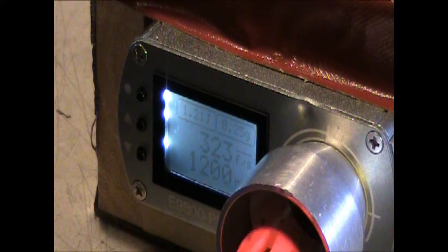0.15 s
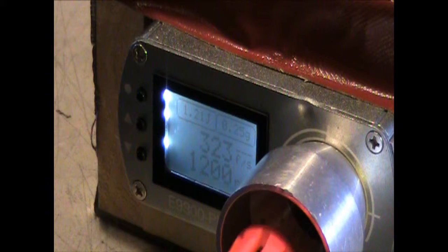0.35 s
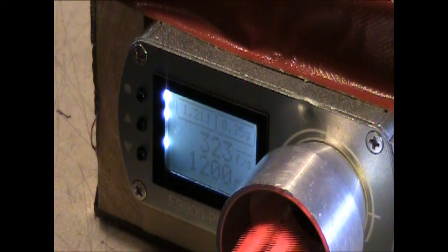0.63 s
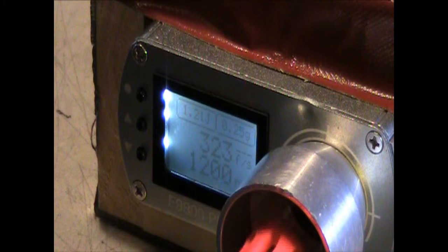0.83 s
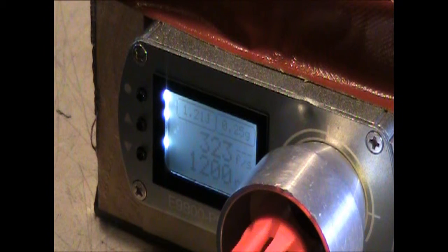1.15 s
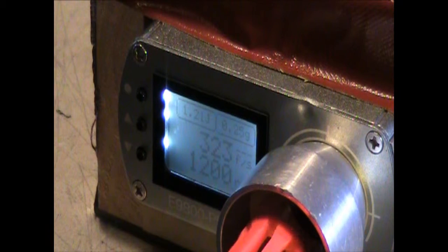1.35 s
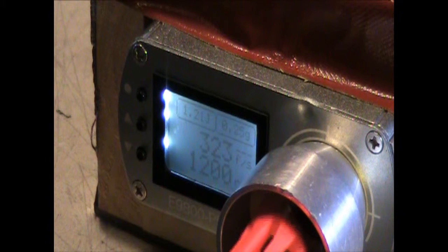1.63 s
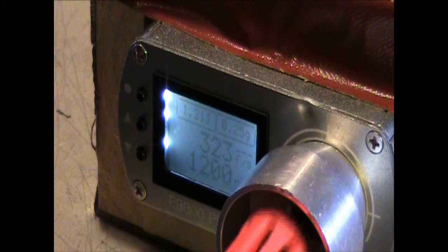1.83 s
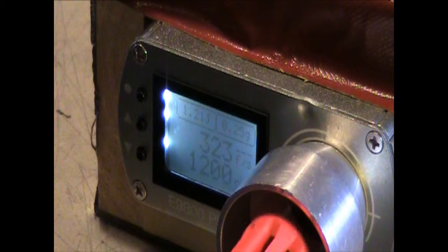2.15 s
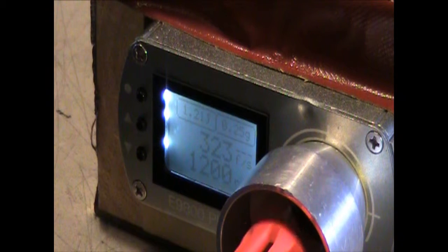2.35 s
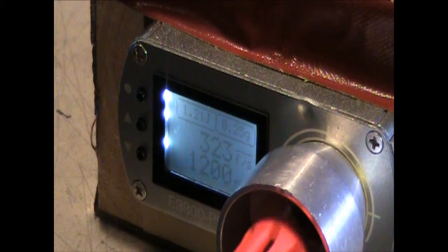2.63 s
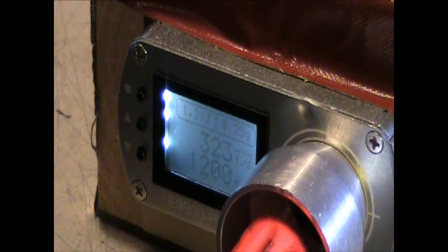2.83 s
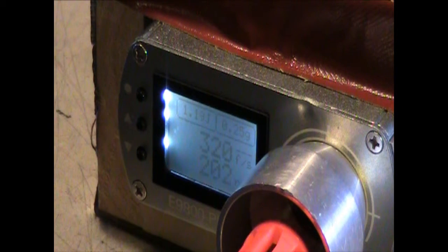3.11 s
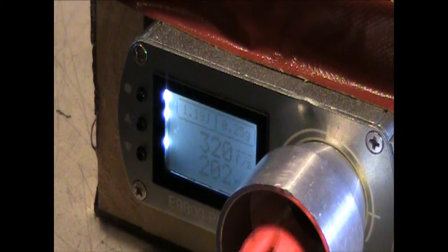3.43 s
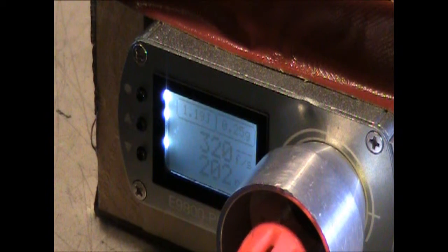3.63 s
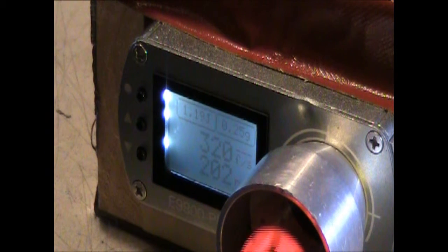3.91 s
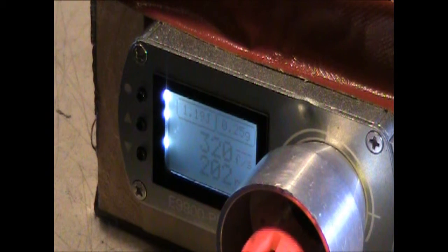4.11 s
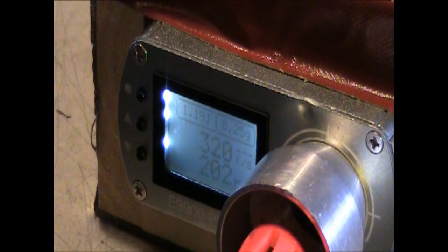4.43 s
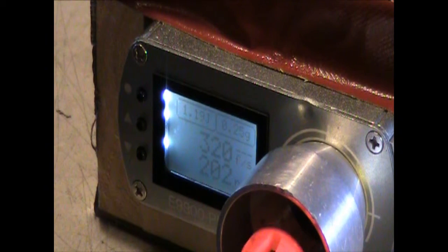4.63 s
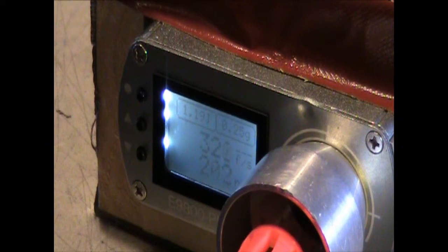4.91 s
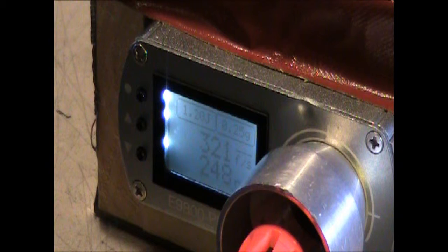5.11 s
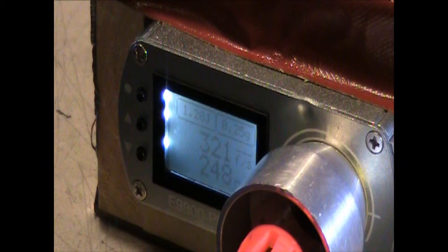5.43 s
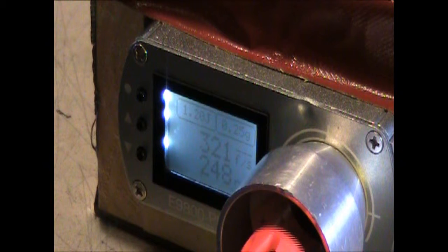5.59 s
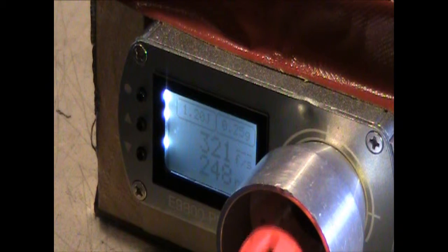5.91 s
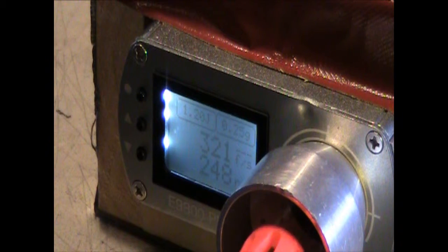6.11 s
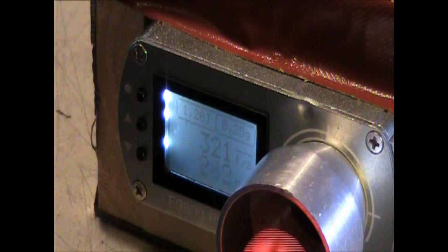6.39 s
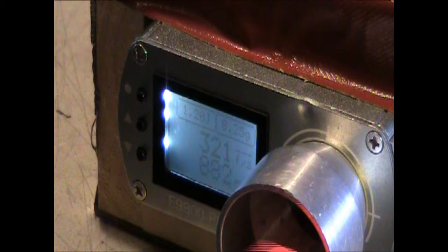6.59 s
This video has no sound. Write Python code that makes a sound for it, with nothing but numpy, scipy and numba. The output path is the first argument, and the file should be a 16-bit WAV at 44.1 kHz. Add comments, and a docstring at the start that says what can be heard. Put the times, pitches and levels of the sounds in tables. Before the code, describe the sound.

Close stereo pickup of an electric airsoft rifle in a small ventilated room. Ten trigger pulls, five of them double: a gritty geared whirr of under a tenth of a second winds up, the piston slams with a bright metallic crack, and the gears coast down. Small plastic trigger clicks fill the gaps. Faint hum and air noise dip after each loud shot, then creep back; the last second holds only soft handling.

```python
"""Airsoft rifle in a small room

An electric airsoft rifle fires into a chronograph: ten trigger pulls, five of them double shots.
Geared motor noise whirrs up against the spring, ringing modes and noise bursts make the piston's slam,
the gears coast to rest, and short filtered bursts give the plastic clicks between.
A close stereo microphone with gain control ducks the humming, ventilated room after loud shots."""
import sys
import numpy as np
from scipy import signal
from scipy.fft import rfft, irfft, next_fast_len
from scipy.io import wavfile
from scipy.ndimage import uniform_filter1d, minimum_filter1d
from numba import njit

SR = 44100
rng = np.random.default_rng(int(sys.argv[2]) if len(sys.argv) > 2 else 0)


def generate_wav(signal):
    """Clip the signal to [-1, 1] and save it as 16-bit WAV at the path in sys.argv[1]."""
    frames = np.transpose(np.atleast_2d(signal))
    scaled = np.clip(frames, -1, 1) * 32767
    pcm = np.round(scaled).astype(np.int16)
    wavfile.write(sys.argv[1], SR, pcm)


N = 297675
TIME = np.arange(N) / SR

# Room air, before the microphone. Each row: frequency in Hz, relative level in dB.
AIR_COLOUR = [(25, -30), (80, -22), (118, -10), (175, -15), (250, -3), (330, -8), (420, -8), (680, -14),
              (1000, -19), (1500, -21.5), (2800, -27.5), (5000, -35.5), (9000, -43), (16000, -50)]
# Mains hum and faint electrical whines. Each row: frequency in Hz, mean rms level in dB.
HUM = [(119.7, -78.5), (240, -69.5), (281, -82.5), (1362, -85), (2719, -93), (4350, -99)]
# Stereo spread of sound from all round. Each row: frequency in Hz, side over mid in dB.
WIDTH = [(100, -7), (700, -6.5), (2000, -7.5), (5000, -2.5), (10000, -3)]
# Colour of the near walls. Each row: frequency in Hz, relative level in dB.
WALL_COLOUR = [(50, -15.5), (150, 7.5), (260, 7.5), (700, 0), (1500, 3.5), (4000, -3), (8000, 1.5),
               (16000, -3)]

# Trigger let go or grip shifted. Each row: start in seconds, click in dB, rebound against the click in dB.
CLICKS = [(.0473, -52.5, -19.5), (.5726, -49, 2), (1.3379, -36.5, -16.5), (1.942, -43, -13.5),
          (2.398, -44, -3), (2.742, -49, -4.5), (2.8716, -42.5, -4.5), (2.927, -45, -22.5),
          (3.3507, -34, -19.5), (3.8152, -43.5, -22), (4.4438, -57, -9), (5.237, -51.5, -3.5),
          (6.5146, -50.5, -16.5), (6.562, -58.5, -15)]
# Rifle shifted in the hands. Each row: centre in seconds, half length in seconds, relative level in dB.
RUSTLES = [(2.875, .04, -69.5), (6.225, 0.016, -69), (6.307, 0.092, -76)]
# A soft tap as the rifle is moved: start in seconds, frequency in Hz, decay in seconds, level in dB.
NUDGE = (6.257, 760, .011, -58)
# Colour of the plastic stock. Each row: frequency in Hz, relative level in dB.
STOCK_COLOUR = [(200, -23), (900, -7.5), (2100, 0), (3000, -7), (4300, -4), (6200, -3.5), (9000, -12),
                (16000, -23.5)]

# Trigger pulls. Each row: motor on in seconds, motor off in seconds, then relative levels in dB
# of the rattle, the whine and the trigger click.
PULLS = [(.217, 0.305, -25.5, -29, -47.5), (.725, 0.814, -25, -30, -60), (1.067, 1.14, -24, -27, -45),
         (1.441, 1.528, -25, -29, -46), (1.741, 1.802, -24.5, -31, -46), (2.025, 2.1, -23, -28.5, -46),
         (3.018, 3.1, -26, -29.5, -63), (3.484, 3.585, -26.5, -27.5, -42.5),
         (3.994, 4.082, -24.5, -27, -46.5), (5.39, 5.475, -27, -28, -65)]
# Gear train partials; slower gears add lines between the overtones.
# Each row: multiple of the mesh pitch, relative level in dB.
WHINE_PARTIALS = [(.67, -14), (1, 0), (1.33, -14), (1.75, -15), (2, -9), (3, -20)]
# Colour of the metal shell. Each row: frequency in Hz, relative level in dB.
SHELL_COLOUR = [(60, -38.5), (250, -24.5), (480, -14.5), (770, -1), (1000, -5), (1300, -4.5), (2000, -1),
                (2900, -4.5), (4100, 2), (5200, -1.5), (6200, 1), (7800, -3.5), (10000, -15.5),
                (16000, -19)]

# Piston landings. Each row: time in seconds, strength in dB, thump of air in the barrel in dB (both relative).
SHOTS = [(0.2725, -2.5, -2), (0.3417, -4, -3), (0.8027, -2, 0), (1.1182, -.5, 1), (1.1935, -0.5, -1),
         (1.5195, -0.5, 1.5), (1.7965, 1, 3), (2.092, 2, 5.5), (3.088, -5, -1), (3.17, -1.5, -1),
         (3.572, -0.5, -3.5), (3.6474, 3, -.5), (4.0808, -1.5, -2.5), (5.4368, -4.5, -1),
         (5.5044, -2, -1.5)]
# Air in the barrel, sounding before the piston lands.
# Each row: frequency in Hz, start after landing in seconds, swell in seconds, relative level in dB.
AIR_MODES = [(80, -.011, .0035, -44), (129, -.0085, .0047, -38.5), (268.6, -.015, .0052, -37),
             (403.7, -.006, .0038, -34.5), (890, -.0064, .0016, -23.5)]
# Resonances of the slam.
# Each row: frequency in Hz, start after landing in seconds, swell in seconds, relative level in dB.
SLAM_MODES = [(703, -.0006, .0013, -14.5), (1125, -.0005, .0014, -19.5), (2332, -.001, .00053, -14),
              (3158, -.0013, .0006, -10), (3957, -.0011, .00054, -11), (4550, -.0008, .00071, -15),
              (7830, 0, 0.0016, -18.5)]
# The spring sings on. Each row: frequency in Hz, relative level in dB, time to fall 60 dB in seconds.
SPRING_MODES = [(1071, -76, 1.4), (2210, -78, 1.0), (5437, -82, 2.2), (5720, -83, 1.4), (6002, -81, 1.6),
                (6095, -81, 1.4), (6200, -81, 1.4), (6820, -81, 1.4)]
# Colour of the muzzle crack. Each row: frequency in Hz, relative level in dB.
CRACK_COLOUR = [(300, -18), (1500, -10), (4000, -9), (6000, -15.5), (8500, 3.5), (11000, -3.5),
                (13000, -7.5), (16000, -16)]

# motor: unloaded mesh pitch, time to spin up, time to race after a landing, braking
FREE_HZ, SPIN_UP_S, RELEASE_S, BRAKE_HZ_PER_S = 3450, .021, .011, 45000
# a part-cocked spring is wound sooner but loads the motor more: mesh pitch per second of winding
MESH_HZ_PER_S = 36800
# how far single teeth and groups of teeth can stray in strength
TOOTH_DB, LUMP_DB, TEETH_PER_LUMP = 3.5, 3.5, 6
# the gears rattle less once the spring is let go
UNLOADED_DB = -2.6
# the piston flies this long before it lands; its scrape off the last tooth decays this fast
STROKE_S, SLIP_S = .009, .0072
# the gear catches the piston rack just after the motor starts
CATCH_S, CATCH_DB = .0145, -26
# the ratchet pawl drops within this time of the last shot of a pull, more softly the later it falls
PAWL_S, PAWL_DB, PAWL_FADE_DB_PER_S = .08, -23, 109.5
CHATTER_FADE_DB_PER_S = 200
# the trigger takes up its slack just before the motor starts
TAKE_UP_S, TAKE_UP_REBOUND_DB = .047, -3
# a plastic part clicks, then springs back with a brighter tick
REBOUND_S, CLICK_TREBLE_DB, REBOUND_TREBLE_DB = .0114, -9, -1.5
MUZZLE_PAN_DB = -.3
TOP_HZ = 16100


def undb(db):
    """Decibels to gain."""
    return 10 ** (np.asarray(db) / 20)


def unit(x):
    """Scale to rms 1."""
    return x / np.sqrt(np.mean(x ** 2))


def span(seconds):
    """A time axis."""
    return np.arange(int(seconds * SR)) / SR


def response(points, size):
    """Gain at each FFT bin through (Hz, dB) points, straight on a log frequency axis."""
    hz, db = np.transpose(points)
    bins = np.fft.rfftfreq(size, 1 / SR) + 1
    return undb(np.interp(np.log(bins), np.log(hz), db))


def colour(x, points):
    """Minimum-phase filter through (Hz, dB) points that keeps the power of white noise."""
    size = 4096
    # folding the cepstrum onto positive times makes the filter causal
    cepstrum = irfft(np.log(unit(response(points, size))))
    cepstrum[1:size // 2] *= 2
    cepstrum[size // 2 + 1:] = 0
    impulse = irfft(np.exp(rfft(cepstrum)))
    return signal.fftconvolve(x, impulse)[:len(x)]


def add(track, start, sound):
    """Mix a sound in at a time in seconds."""
    i = max(int(start * SR), 0)
    track[i:i + len(sound)] += sound[:N - i]


def burst(decay_s):
    """A contact: noise that dies away at once."""
    t = span(.06)
    return rng.standard_normal(len(t)) * np.exp(-t / decay_s)


def ring(t, modes):
    """Resonances that swell and die away around time zero."""
    sound = np.zeros(len(t))
    for hz, start, swell, db in modes:
        age = np.maximum(t - start, 0)
        envelope = age / swell * np.exp(1 - age / swell)
        sound += undb(db) * envelope * np.sin(2 * np.pi * hz * age)
    return sound


def diffuse(size):
    """Stereo noise from all round: the channels are more alike in the bass than in the treble."""
    share = response(WIDTH, size)
    mid, side = rfft(rng.standard_normal((2, size)))
    left_right = np.array([mid + share * side, mid - share * side])
    return irfft(left_right / np.sqrt(1 + share ** 2), size)


def place(x, lead_samples, pan_db):
    """A source to the left reaches the left capsule sooner and, with positive pan, louder."""
    size = next_fast_len(N)
    delay = np.exp(-2j * np.pi * np.fft.rfftfreq(size) * lead_samples)
    late = irfft(rfft(x, size) * delay, size)[:N]
    return np.array([x * undb(pan_db / 2), late * undb(-pan_db / 2)])


def background(air_db, pan_db):
    """Ventilation as coloured diffuse noise, under slightly wavering mains hum lines."""
    air = unit(np.array([colour(side, AIR_COLOUR) for side in diffuse(N)]))
    hum = np.zeros(N)
    for hz, db in HUM:
        drift = np.interp(TIME, np.linspace(0, TIME[-1], num=50), rng.standard_normal(size=50))
        level = np.sqrt(2) * undb(db + 1.0 * drift)
        hum += level * np.sin(2 * np.pi * hz * TIME + 0.2 * drift)
    return (undb(air_db) * air + hum) * undb(np.array([[pan_db], [-pan_db]]) / 2)


def room(x, wet_db, t60, treble_t60, build_s):
    """Near walls answer within milliseconds and die away fast, the treble first."""
    t = span(.6)
    noise = diffuse(len(t)) * (1 - np.exp(-(t / build_s) ** 2))
    low = signal.sosfiltfilt(signal.butter(2, 4000, fs=SR, output="sos"), noise)
    low_tail = low * np.exp(-np.log(1000) * t / t60)
    treble_tail = (noise - low) * np.exp(-np.log(1000) * t / treble_t60)
    tail = unit(low_tail + treble_tail) / np.sqrt(len(t))
    echoes = [signal.fftconvolve(x, colour(side, WALL_COLOUR))[:N] for side in tail]
    return undb(wet_db) * np.array(echoes)


def nudge(s, hz, decay_s, db):
    """One soft, hollow tap: a decaying sine."""
    track, t = np.zeros(N), span(0.11)
    add(track, s, undb(db) * np.exp(-t / decay_s) * np.sin(2 * np.pi * hz * t))
    return track


def tick(treble_db):
    """One plastic contact, dull or bright by the share of treble in its noise."""
    touch = burst(decay_s=0.0018)
    dull = signal.sosfilt(signal.butter(2, 4500, fs=SR, output="sos"), touch)
    bright = signal.sosfilt(signal.butter(2, 4500, "high", fs=SR, output="sos"), touch)
    # the bands are in opposite phase, so subtracting joins them
    return dull - undb(treble_db) * bright


def handling():
    """Plastic parts click and spring back; hands rub the stock as swelling noise."""
    contact = np.zeros(N)
    take_ups = [(on - TAKE_UP_S, db, TAKE_UP_REBOUND_DB) for on, *_, db in PULLS]
    for s, db, rebound_db in CLICKS + take_ups:
        add(contact, s, undb(db) * tick(CLICK_TREBLE_DB))
        add(contact, s + REBOUND_S, undb(db + rebound_db) * tick(REBOUND_TREBLE_DB))
    for s, half, db in RUSTLES:
        swell = np.exp(-((TIME - s) / half) ** 2)
        contact += undb(db) * swell * rng.standard_normal(N)
    return colour(contact, STOCK_COLOUR)


def gears(on, off, loaded_db, whine_db):
    """One pull: the motor spins up under load, races after the first landing, then coasts to rest."""
    t = span(.25)
    wobble, tooth_chance, hiss, seating, lump_chance = rng.standard_normal((5, len(t)))
    landing = min(s for s, *_ in SHOTS if s > on) - on
    loaded_hz = MESH_HZ_PER_S * landing
    driven = np.minimum(t, off - on)
    load = np.exp(-np.maximum(driven - landing, 0) / RELEASE_S)
    hz = load * loaded_hz * (1 - np.exp(-t / SPIN_UP_S)) + (1 - load) * FREE_HZ
    hz = np.maximum(hz - BRAKE_HZ_PER_S * (t - driven), 0)
    jitter = 1 + .045 * unit(uniform_filter1d(wobble, size=40))
    phase = 2 * np.pi * np.cumsum(hz * jitter) / SR
    # the teeth take up their slack; the starting current gives a surge of torque
    bite = np.minimum(.1 + (t / .014) ** 2, 1) * (1 + .5 * np.exp(-t / .035))
    coast = np.where(t > driven, hz / hz.max(), 1)
    slack = np.clip((t - landing + STROKE_S) / 0.0044, 0, 1)
    force = undb(loaded_db + UNLOADED_DB * slack)
    # every tooth strikes with its own strength; the slower second gear makes the rattle lumpy
    tooth = (phase / (2 * np.pi)).astype(int)
    lumps = undb(LUMP_DB * np.tanh(lump_chance[tooth // TEETH_PER_LUMP]))
    strength = undb(TOOTH_DB * np.tanh(tooth_chance[tooth])) * lumps
    strike = strength * (1 + .5 * np.cos(phase)) * coast ** .55
    rattle = strike / np.sqrt(np.mean(strike[t <= driven] ** 2)) * hiss
    # the whine comes and goes as the teeth seat, and is first to fade without drive
    waver = undb(3 * unit(uniform_filter1d(seating, size=130))) * coast ** 2
    whine = waver * sum(undb(db) * np.sin(k * phase) for k, db in WHINE_PARTIALS)
    return bite * (force * rattle + undb(whine_db - 3.5) * whine)


def gearbox():
    """Gears, pawl and piston all shake the same metal shell, which colours their noise."""
    shake = np.zeros(N)
    for on, off, rattle_db, whine_db, _ in PULLS:
        add(shake, on, gears(on, off, rattle_db, whine_db))
        add(shake, on + CATCH_S, undb(CATCH_DB) * burst(decay_s=.0024))
        last_shot = max(s for s, *_ in SHOTS if s < off + .1)
        # the pawl drops twice
        for delay in PAWL_S * rng.random(size=2):
            pawl_db = PAWL_DB - PAWL_FADE_DB_PER_S * delay
            add(shake, last_shot + delay, undb(pawl_db) * burst(decay_s=.0024))
    for s, db, _ in SHOTS:
        # the piston slips off the last tooth, then lands
        add(shake, s - STROKE_S, undb(db - 34.5) * burst(decay_s=SLIP_S))
        add(shake, s, undb(db - 13.0) * burst(decay_s=0.0075))
    return colour(shake, SHELL_COLOUR)


def spring(age):
    """The spring sings on after the landing: slowly decaying sines."""
    song = np.zeros(len(age))
    for hz, db, t60 in SPRING_MODES:
        song += undb(db) * np.exp(-np.log(1000) * age / t60) * np.sin(2 * np.pi * hz * age)
    return song


def shots():
    """Air drives down the barrel, the piston slams, the muzzle cracks; then loose parts chatter."""
    t = span(2)
    lead = .02  # seconds kept before the landing
    thump = ring(t - lead, AIR_MODES)
    slam = ring(t - lead, SLAM_MODES) + spring(np.maximum(t - lead, 0))
    crack = burst(decay_s=0.0013)  # the same noise at every shot
    body, sharp = np.zeros(N), np.zeros(N)
    for s, db, thump_db in SHOTS:
        add(body, s - lead, undb(thump_db) * thump + undb(db) * slam)
        add(sharp, s, undb(db - 9.5) * crack)
        # the piston bounces once
        add(sharp, s + 0.0067, undb(db - 23) * burst(decay_s=0.003))
        for delay in rng.random(size=8) * 0.084:
            chatter_db = db - 25 - CHATTER_FADE_DB_PER_S * delay
            add(sharp, s + delay, undb(chatter_db) * burst(decay_s=.0009))
    return body + colour(sharp, CRACK_COLOUR)


def scene():
    """The muzzle is almost straight ahead; gearbox and hands are further off to the left."""
    action = gearbox() + handling()
    muzzle = shots() + nudge(*NUDGE)
    direct = place(action, lead_samples=1.41, pan_db=1.1)
    direct = direct + place(muzzle, lead_samples=0.11, pan_db=MUZZLE_PAN_DB)
    to_walls = action + undb(-3.5) * muzzle
    walls = room(to_walls, wet_db=-10.5, t60=0.3, treble_t60=0.22, build_s=0.0088)
    return direct + walls + background(air_db=-65, pan_db=-0.5)


@njit
def follow(size, attack, release):
    """Peak follower: rises fast, sinks slowly."""
    out, e = np.empty(len(size)), 0.
    for i in range(len(size)):
        e += (size[i] - e) * (attack if size[i] > e else release)
        out[i] = e
    return out


def gain_control(x, ceiling_db, attack_s, release_s):
    """Loud peaks pull the gain down just ahead of the sound; it creeps back slowly."""
    coming = -minimum_filter1d(-np.abs(x).max(axis=0), size=31)
    peak = follow(coming, 1 - np.exp(-1 / (attack_s * SR)), 1 / (release_s * SR))
    reduction = np.maximum(peak / undb(ceiling_db), 1)
    return x / uniform_filter1d(reduction, size=31)


def record(dry):
    """The capsules lose deep bass, the left more; then gain control, rounded peaks and a steep top cut."""
    heard = signal.sosfilt(signal.butter(1, 50, "high", fs=SR, output="sos"), dry)
    bass = signal.sosfilt(signal.butter(1, 600, fs=SR, output="sos"), heard)
    # bass a little down on the left, up on the right
    heard = heard + .11 * np.array([[-1], [1]]) * bass
    held = gain_control(heard, ceiling_db=-14.0, attack_s=.0002, release_s=0.43)
    headroom = .4
    rounded = headroom * np.tanh(held / headroom)
    top_cut = signal.ellip(8, .1, 60, TOP_HZ, fs=SR, output="sos")
    return signal.sosfiltfilt(top_cut, rounded)


dry = scene()
out = record(dry)
generate_wav(out)
```